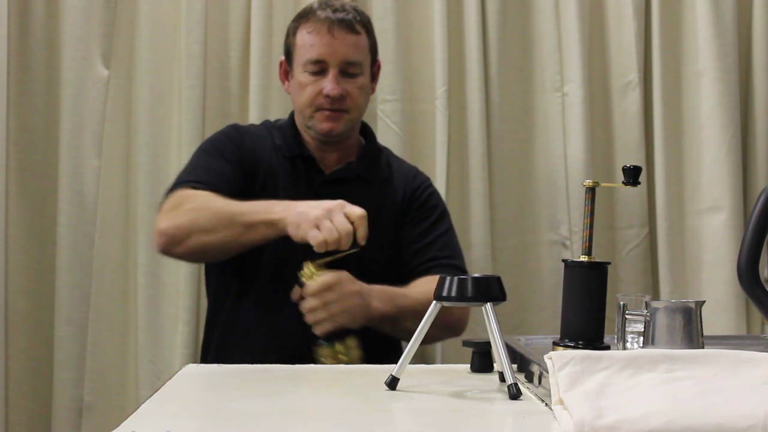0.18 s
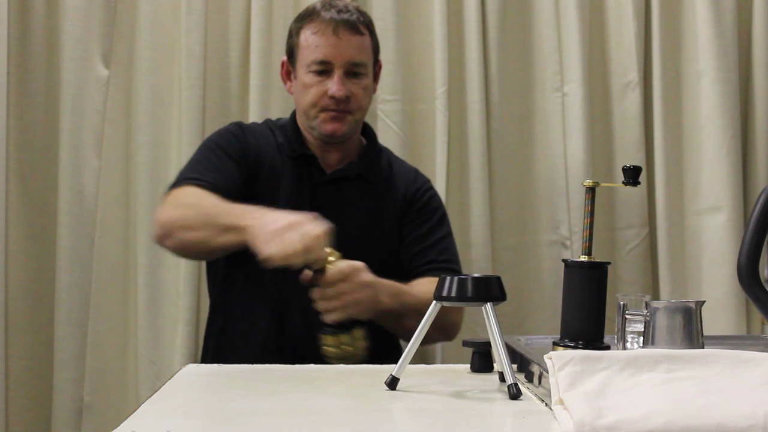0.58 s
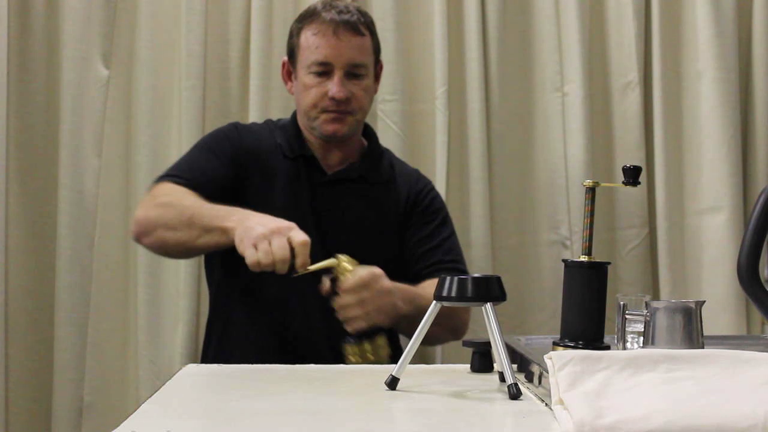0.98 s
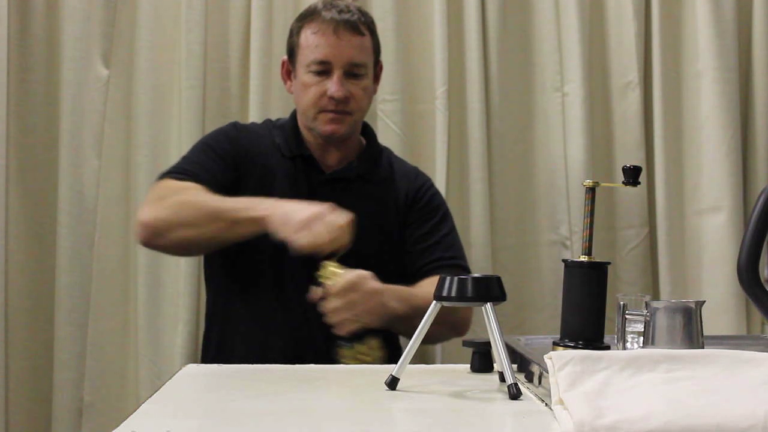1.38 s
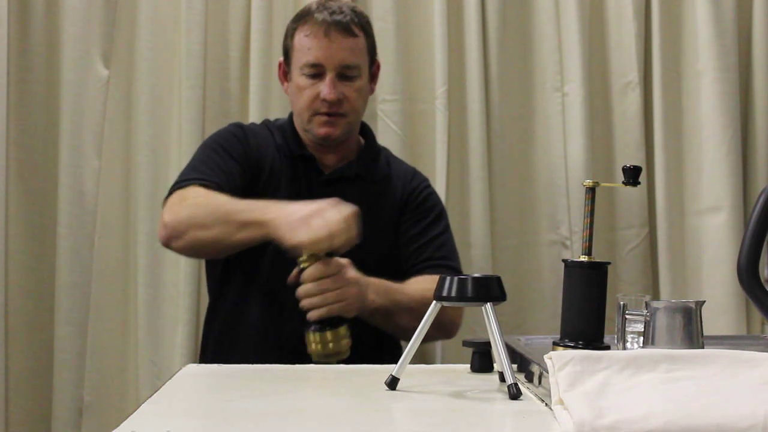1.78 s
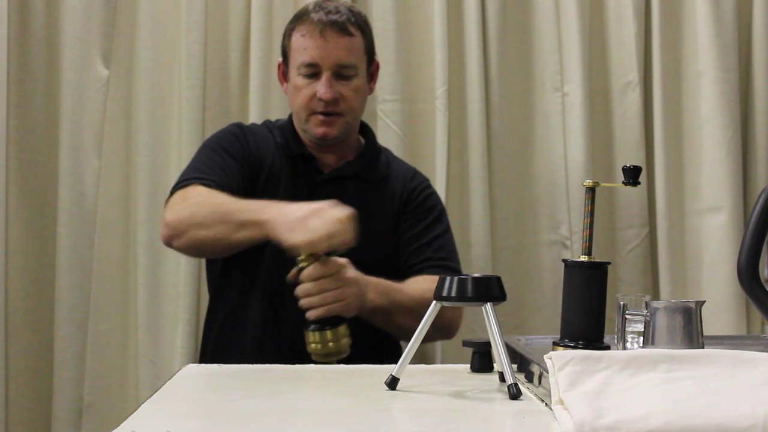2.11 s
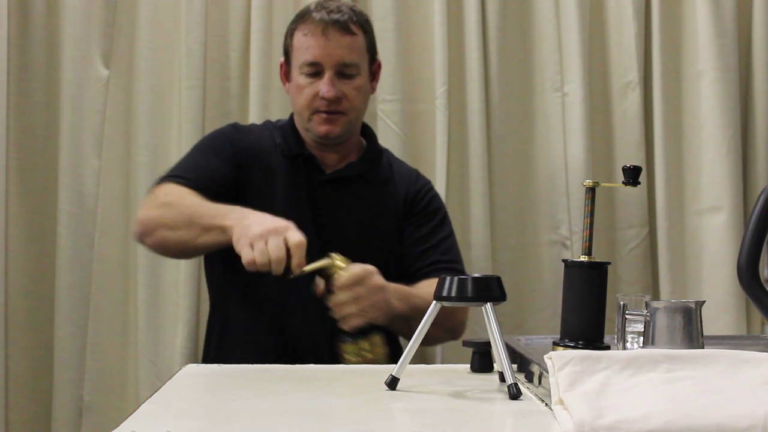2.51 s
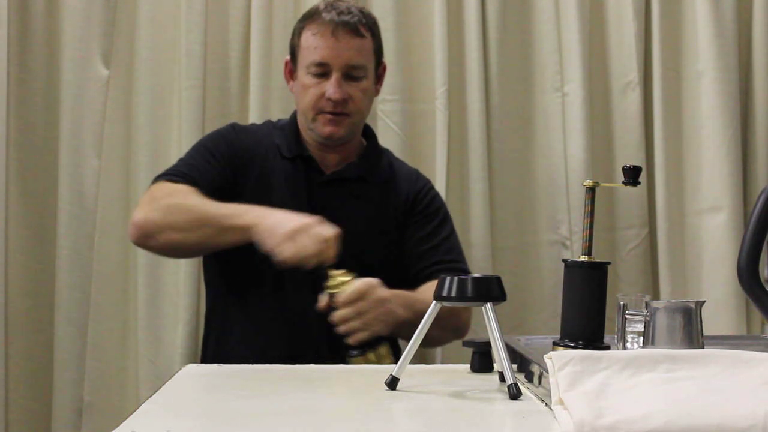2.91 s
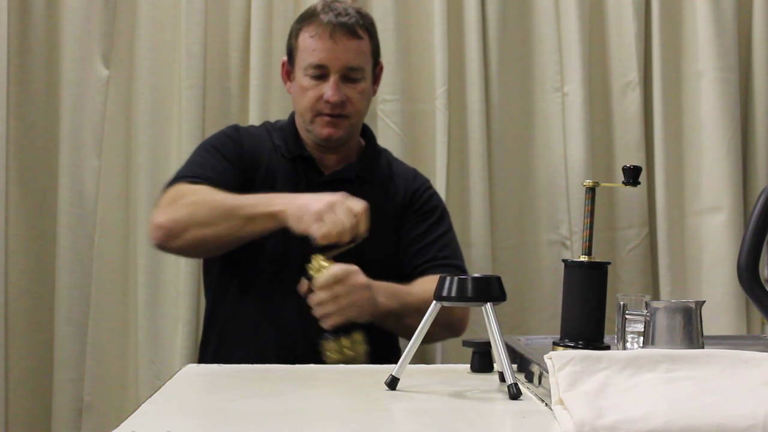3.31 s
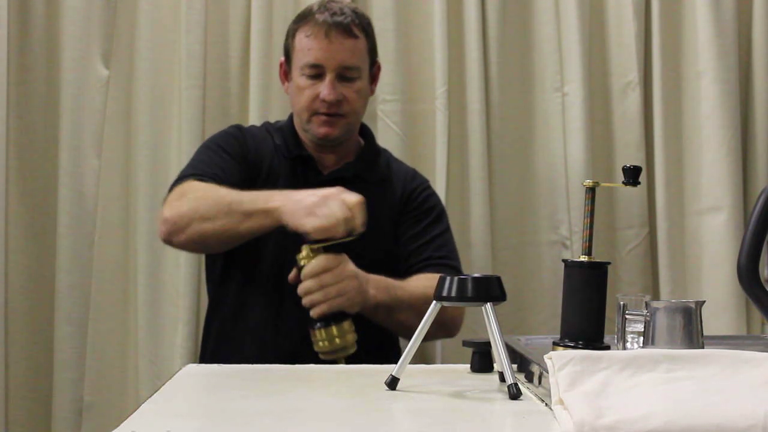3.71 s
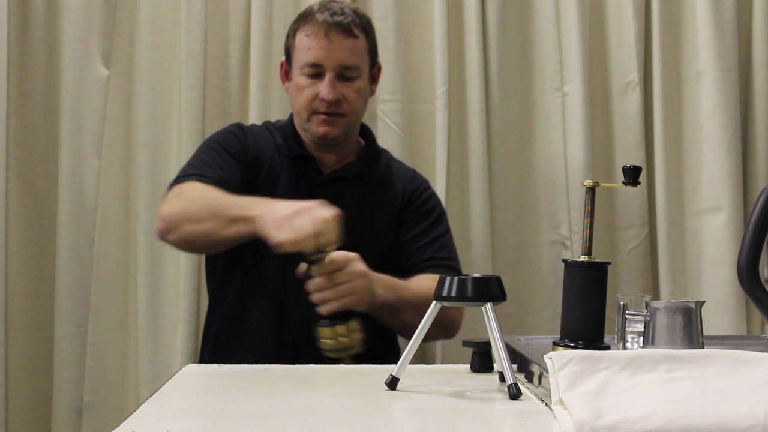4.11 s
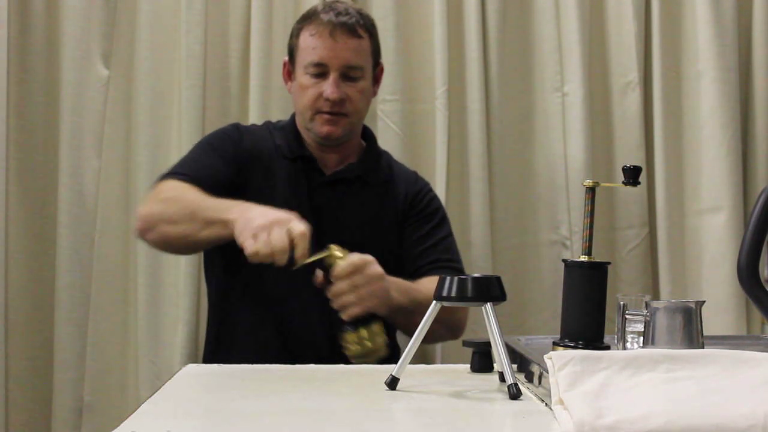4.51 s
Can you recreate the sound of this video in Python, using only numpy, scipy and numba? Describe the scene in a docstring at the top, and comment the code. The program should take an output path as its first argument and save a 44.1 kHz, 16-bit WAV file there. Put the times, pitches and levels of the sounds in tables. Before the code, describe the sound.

A hand coffee mill is cranked fast and steadily, beans crunching in a dense, bright, rattling crackle in a softly damped room.

```python
"""Hand coffee mill in a curtained room

A hand mill is cranked about three turns a second, two metres from the microphone.
Beans break between the burrs in a dense noise crackle that rings burr, shaft, tube and cup resonances;
single beans crack louder as short filtered bursts, and the crank squeaks now and then.
As the mill wobbles in the fist its resonances swell in turn; a faint wavering hum lies under it."""
import sys
import numpy as np
from scipy import signal
from scipy.fft import rfft, irfft, next_fast_len
from scipy.io import wavfile
from scipy.ndimage import uniform_filter1d
from numba import njit

SR = 44100
rng = np.random.default_rng(int(sys.argv[2]) if len(sys.argv) > 2 else 0)


def boost(x):
    """Linear amplitude factor 10**(x/20) for a level x in decibels (scalar or array-like)."""
    u = np.asarray(x, float) / 20
    return 10 ** u


def put_to_file(sound):
    """Save the sound as 16-bit audio at rate SR, in the file named by the first command-line argument."""
    columns = np.atleast_2d(sound).T  # one column per channel
    safe = np.clip(columns, -1, 1)
    whole_steps = np.round(safe * 32767)
    wavfile.write(sys.argv[1], SR, whole_steps.astype(np.int16))


N = 206737

# resonances of the burrs: centre_hz, width_hz, relative level_db
BURR_MODES = [(4170, 630, 0), (5000, 120, -16), (7600, 380, 13), (7900, 1400, -2)]


def level(x, db):
    """Scale to an rms level."""
    return x * boost(db) / np.sqrt(np.mean(x ** 2))


def curve(table):
    """Columns of a table, drawn as straight lines between its times, sample by sample."""
    s, *columns = np.transpose(table)
    return [np.interp(np.arange(N) / SR, s, c) for c in columns]


def walk(rate):
    """Random levels held 1 / rate s and slewed twice; spread near 1."""
    k = int(SR / rate)
    steps = np.repeat(rng.standard_normal(N // k + 1), k)
    return 1.39 * uniform_filter1d(uniform_filter1d(steps, k), k)[:N]


def swells(times, heights, dies_s, rise_s):
    """Sum of swells that rise straight to their height at each time and die away exponentially."""
    t = np.arange(N) / SR
    out = np.zeros(N)
    for s, height, die_s in zip(times, heights, dies_s):
        rise = np.clip(1 + (t - s) / rise_s, 0, 1)
        out += height * rise * np.exp(-np.maximum(t - s, 0) / die_s)
    return out


@njit
def band(x, hz, width):
    """State-variable resonance with a centre that may move, gain 1 at the centre."""
    y, b, l = np.empty(len(x)), 0., 0.
    for i in range(len(x)):
        g, k = np.tan(np.pi * hz[i] / SR), width / hz[i]
        v = (b + g * (x[i] - l)) / (1 + g * (g + k))
        b, l, y[i] = 2 * v - b, l + 2 * g * v, k * v
    return y


def ring(force, modes):
    """Every mode feels the same force envelope, filled with noise of its own."""
    out = np.zeros(N)
    for hz, width, db in modes:
        b, a = signal.iirpeak(hz, hz / width, fs=SR)
        out += boost(db) * signal.lfilter(b, a, force * rng.standard_normal(N))
    return out


def colour(x, points):
    """Impose a spectrum given on a log-frequency axis."""
    hz, db = np.transpose(points)
    size = next_fast_len(N)
    f = np.maximum(np.arange(size // 2 + 1) * SR / size, 1)
    gain = boost(np.interp(np.log(f), np.log(hz), db))
    return irfft(rfft(x, size) * gain, size)[:N]


def grinding():
    """One stream of fractures shakes every part; the body adds contacts of its own."""
    # how full the burrs run and how far the fist damps tube and cup: s, crushing_db, damp_db
    feed = [(0, -38, -0.5), (.35, -36.5, 4.5), (.68, -40, -1), (.9, -39.5, -0.5), (1.15, -40, -2.5),
            (1.45, -41, 0), (1.63, -42.5, -3), (1.85, -42.5, -3.5), (2.1, -39.5, 2.5), (2.45, -41, 1),
            (2.9, -42, -2.5), (3.05, -40.5, 2), (3.4, -40, -1), (3.7, -39, 3), (3.9, -40, 1),
            (4.22, -41.5, 4), (4.4, -38, 0.5), (4.55, -39, 4.5), (4.69, -37.5, 2)]
    # a fresh load of beans drops into the burrs: start_s, swell_db, dies_s, sideways_load_on_shaft_db
    bites = [(.15, 1, 0.12, 13), (.33, -1.5, .05, 7), (.6, 4.5, 0.024, -1), (.72, 3, 0.09, -9),
             (.83, 3, 0.13, 8), (1.2, 6.5, 0.059, -3), (1.37, 2.5, 0.13, 8), (1.49, 3, .05, 7),
             (1.67, 6, 0.2, 4), (1.89, 2, 0.021, 4), (1.96, 0, .04, -3), (2.18, 3, 0.024, 9),
             (2.4, 3.5, 0.084, 0), (2.52, 1.5, 0.019, 8), (2.62, 2.5, .05, 0), (2.7, 4.5, 0.13, -2),
             (3.08, 3.5, 0.23, 3), (3.43, 5.5, 0.024, 3), (3.6, 0.5, .05, -2), (3.79, 4, 0.031, 0),
             (3.95, 2.5, 0.21, 2), (4.12, 5.5, 0.023, -7), (4.31, -0.5, .05, 1), (4.41, 1.5, 0.087, 2)]
    # beans scrape along the tube wall: start_s, swell_db, dies_s, resonance_hz
    scrapes = [(.16, 7.5, 0.06, 1630), (.45, 3.5, 0.033, 1620), (.64, 2, 0.054, 1760), (1., 2, .05, 1770),
               (1.3, 7, 0.024, 1640), (1.39, 3, .04, 1520), (1.72, 3, .06, 1650), (1.9, 5, 0.033, 1620),
               (2.08, 6.5, .1, 1760), (2.31, 4, 0.036, 1740), (2.61, 8, 0.037, 1480),
               (2.69, 5.5, .05, 1760), (2.76, 3, .06, 1880), (2.96, 6.5, .04, 1500), (3.6, 5, 0.043, 1750),
               (3.93, 2, 0.045, 1780), (4.1, 5, 0.039, 1760), (4.54, 8.5, 0.086, 1680)]
    # the grounds jump in the cup: start_s, swell_db, dies_s
    jolts = [(.03, 5.5, 0.024), (.2, 6.5, 0.15), (.33, 3, 0.092), (.55, 2, 0.14), (.9, 3.5, 0.021),
             (1.23, 11, 0.05), (1.37, 7, 0.027), (1.5, 11, 0.034), (1.72, 11, 0.076), (1.9, 4.5, 0.033),
             (1.98, 5, 0.021), (2.28, 5.5, 0.11), (2.46, 7, 0.32), (2.98, 2.5, 0.031), (3.13, 6.5, 0.035),
             (3.81, 4.5, 0.11), (4.08, 7, 0.091), (4.25, 6, 0.097), (4.4, 2.5, 0.033), (4.62, -0.5, 0.034)]
    # resonances of air column, tube wall, cup and shaft: centre_hz, width_hz, relative level_db
    air_modes = [(1180, 100, -1), (1250, 150, -0.5), (1375, 160, 3)]
    wall_modes = [(1500, 74, 5), (1635, 91, -7), (1798, 74, -3.5), (2050, 240, -8), (2670, 570, -8)]
    cup_modes = [(381, 220, -7), (550, 90, 0), (721, 117, -1), (877, 130, 1.5), (1070, 74, 4)]
    shaft_modes = [(4750, 150, -5), (5030, 170, -14)]

    # wall and cup follow the feed, less the damping of the fist
    crush_db, damp_db = curve(feed)
    wall_db = crush_db + 0.2 - damp_db
    cup_db = crush_db - 8 - 0.32 * damp_db
    s, swell_db, dies_s, load_db = np.transpose(bites)
    crush_db = crush_db + swells(s, swell_db, dies_s, rise_s=.03)
    shaft_db = -4.5 + swells(s, load_db, dies_s, rise_s=.03)
    s, swell_db, dies_s, hz = np.transpose(scrapes)
    wall_db = wall_db + swells(s, swell_db, dies_s, rise_s=0.044)
    scrape_hz = curve(np.c_[s, hz])[0] + 60 * walk(15)
    cup_db = cup_db + swells(*np.transpose(jolts), rise_s=.06)
    air_db, air_hz = cranking()

    beans = crackle(per_s=500, spread_db=3., most_db=10, rub=1.8, bite_db=1.)
    body = crackle(per_s=300, spread_db=-0.5, most_db=8.5, rub=3.3, bite_db=-0.36)
    knocks = 0.41 * beans + body

    burr = level(ring(beans, BURR_MODES), -10.5) + level(crumbs(beans), 0.27)
    # the shaft follows its sideways load: its level swings more than the rest
    shaft = boost(shaft_db) * level(ring(beans, shaft_modes), -10.0)

    # the hand shifts on the tube and the beans tumble, so the strongest resonances slide
    sliding = band(knocks * rng.standard_normal(N), air_hz, 100.)
    air = band(level(ring(knocks, air_modes), -3) + level(sliding, -2), air_hz, 300.)
    scrape = band(knocks * rng.standard_normal(N), scrape_hz, 380.0)
    scrape = band(scrape, scrape_hz, 380.0)
    wall = band(ring(knocks, wall_modes), np.full(N, 1900.), 950.0)
    wall = level(wall, -6.5) + level(scrape, -5)
    cup = band(ring(knocks, cup_modes), np.full(N, 750.), 1130.0)

    tube = boost(air_db) * level(air, -0.34) + boost(wall_db) * wall
    return boost(crush_db) * (burr + shaft) + squeaks(knocks) + tube + boost(cup_db) * level(cup, -0.085)


def crackle(per_s, spread_db, most_db, rub, bite_db):
    """Force envelope: brief unequal fractures over a steady rub; the bite of the burrs comes and goes."""
    sizes_db = np.minimum(spread_db * rng.exponential(size=N), most_db)
    hits = (rng.random(N) < per_s / SR) * boost(sizes_db)
    breaks = signal.lfilter([1], [1, -np.exp(-1 / (0.00043 * SR))], hits)  # each dies over 0.43 ms
    return level((level(breaks, 0) + rub) * boost(bite_db * walk(50)), 0)


def crumbs(beans):
    """Coarse, middling and fine fragments break partly on their own, each size in its own register."""
    # registers of the three fragment sizes: low_hz, high_hz
    registers = [(1500, 3300), (3700, 6220), (6400, 16000)]
    # spectrum laid over the fragments: hz, gain_db
    crumb_spectrum = [(1180, -13), (2000, 0), (3010, -1), (3310, 1.5), (3960, -2.5), (4800, -2), (5830, -8),
                      (7020, -3), (7670, -3.5), (10100, -7), (10600, -12), (11800, -24), (15300, -58),
                      (22000, -120)]
    out = np.zeros(N)
    for lo_hz, hi_hz in registers:
        force = beans + crackle(per_s=900, spread_db=2., most_db=8, rub=1.4, bite_db=1.4)
        sos = signal.butter(2, (lo_hz, hi_hz), "band", fs=SR, output="sos")
        out += signal.sosfilt(sos, force * rng.standard_normal(N))
    return colour(out, crumb_spectrum)


def cracks():
    """Each bean: a noise burst of a few milliseconds around its own pitch that rings burr and tube."""
    # louder beans: start_s, relative snap_db, pitch_hz, relative thud_db into the tube
    loud_beans = [(0.0973, -25, 3210, -9), (0.1216, -21, 7490, -11), (0.146, -17, 3400, -10),
                  (0.2002, -26, 5190, -18), (0.3295, -20.5, 3920, -8.5), (0.7948, -18, 5280, -18),
                  (0.8274, -18.5, 4890, -17), (0.9965, -25, 2000, -8), (1.1925, -19, 3900, -27),
                  (1.2035, -20, 3500, -18), (1.3102, -20.5, 2690, -7), (1.3693, -15, 4900, -15),
                  (1.4905, -26, 4680, -14), (1.6701, -21, 3900, -13), (1.6876, -18, 4140, -16),
                  (1.7504, -22.5, 2050, -19), (1.8906, -20.5, 4800, -9), (1.9443, -25, 2330, -11),
                  (1.972, -22.5, 2540, -20), (2.0573, -22, 2200, -22), (2.177, -15, 4780, -14),
                  (2.215, -17.5, 2130, -7), (2.4023, -26, 3540, -11), (2.5152, -23.5, 7540, -12),
                  (2.6783, -21.5, 3540, -4), (2.7028, -23, 3320, -23), (2.7267, -19, 4160, -23),
                  (2.7852, -23, 4090, -10), (3.052, -20, 4480, -17), (3.1143, -19, 4470, -14),
                  (3.3636, -22, 3480, -10), (3.4034, -21, 3080, -11), (3.427, -20, 5050, -16),
                  (3.6322, -34, 2100, -13), (3.7359, -21, 2660, -15), (3.959, -19.5, 3460, -13),
                  (4.1248, -29, 3240, -5), (4.3011, -20, 2250, -8), (4.359, -20.5, 4830, -10),
                  (4.42, -19, 2920, -17), (4.4635, -17.5, 2010, -27), (4.5486, -20, 8000, -11),
                  (4.589, -19, 3290, -14), (4.613, -19, 2330, -5.5)]
    t = np.arange(int(.015 * SR)) / SR
    steady = np.ones(len(t))
    beans = np.r_[loud_beans, small_cracks(count=25)]
    noises = rng.standard_normal((len(beans), len(t)))
    out = np.zeros(N + len(t))
    for (s, db, hz, thud_db), noise in zip(beans, noises):
        burst = noise * t * np.exp(-t / .0005)
        bright = band(band(burst, 3600. * steady, 4000.), 3600. * steady, 4000.)
        snap = band(burst, hz * steady, .25 * hz) + .7 * bright
        for f, width, gain_db in BURR_MODES:
            snap = snap + 0.25 * boost(gain_db) * band(burst, f * steady, 1. * width)
        thud = band(band(burst, 1390.0 * steady, 650.0), 1480.0 * steady, 700.)
        # the thud is lifted 6 dB over its table entry
        bean = snap / np.abs(snap).max() + boost(thud_db + 6) * thud / np.abs(thud).max()
        i = int(s * SR)
        out[i:i + len(t)] += boost(db) * bean
    return signal.lfilter(*signal.butter(4, 10500, fs=SR), out[:N])


def small_cracks(count):
    """Mostly quieter beans at random moments and pitches, in the columns of the louder ones."""
    u = rng.random((count, 4))
    s = u[:, 0] * N / SR
    snap_db = -27.5 + 8 * (u[:, 1] - .5)
    pitch_hz = 2000 * 2.5 ** u[:, 2]
    thud_db = -10.5 + 12 * (u[:, 3] - .5)
    return np.c_[s, snap_db, pitch_hz, thud_db]


def cranking():
    """Level and pitch of the air column: a swell once a turn, as the mill's mouth faces the microphone."""
    # the open top swings towards the microphone: s, swell_db, air_column_hz
    turns = [(-.28, 8, 1250), (.04, 6.5, 1264), (.31, 9, 1204), (.62, 4, 1250), (.94, 5, 1235),
             (1.23, 7.5, 1240), (1.55, 2.5, 1235), (1.86, 4, 1250), (2.19, 8.5, 1254), (2.46, 5.5, 1194),
             (2.8, 5.5, 1240), (3.12, 4.5, 1260), (3.47, 8, 1265), (3.81, 8, 1240), (4.12, 7, 1194),
             (4.49, 6.5, 1270), (4.8, 9, 1250)]
    swell_db, hz = curve(turns)
    turn = np.interp(np.arange(N) / SR, np.transpose(turns)[0], np.arange(len(turns)))
    facing = (.5 + .5 * np.cos(2 * np.pi * turn)) ** 0.93
    air_db = -44 + swell_db * facing + 0.32 * walk(15)
    return air_db, hz + 24 * walk(12)


def squeaks(force):
    """The crank rubs on its shaft once in a while and sings a narrow, chattering note."""
    # squeaks: start_s, length_s, level_db (rms ahead of the fades), pitch_hz
    squeak_notes = [(.08, 0.088, -50, 3300), (0.709, 0.088, -41, 3430), (1.051, 0.14, -49, 3320),
                    (1.378, 0.084, -46, 3300), (2.283, 0.056, -42.5, 3290), (2.535, 0.084, -49, 3290),
                    (2.673, 0.08, -42, 3340), (3.949, 0.096, -50, 3380), (4.263, .07, -44, 3300),
                    (4.567, 0.14, -45, 3300)]
    out = np.zeros(N)
    t = np.arange(N) / SR
    for s, length, db, hz in squeak_notes:
        edge = np.clip(np.minimum(t - s, s + length - t) / 0.021, 0, 1)  # 21 ms fades
        on = edge > 0
        pitch = np.full(on.sum(), 1. * hz)
        note = band(force[on] * rng.standard_normal(on.sum()), pitch, 200.)
        note = band(note, pitch, 200.)
        out[on] = edge[on] * level(note, db)
    return out


def room(x, t60_s, wet_db, damp_hz, count=5):
    """Curtains leave a short, dull tail; the wobbling mill sounds the room from ever-changing spots."""
    t = np.arange(int(.3 * SR)) / SR
    decay = np.exp(-np.log(1000) * t / t60_s) * (t > .003)  # first reflections after 3 ms
    tails = rng.standard_normal((count, len(t))) * decay
    tails = signal.lfilter(*signal.butter(1, damp_hz, fs=SR), tails)
    spots = np.array([walk(18) for _ in tails])
    spots /= np.sqrt(np.sum(spots ** 2, axis=0))
    wet = np.zeros(N)
    for spot, tail in zip(spots, tails):
        wet += signal.fftconvolve(x * spot, tail / np.sqrt(np.sum(tail ** 2)))[:N]
    return x + boost(wet_db) * wet


def background():
    """Low room rumble of shaped noise, a sine hum that swells and wavers, and a thin mains tone."""
    # spectrum of the rumble: hz, relative level_db
    rumble_spectrum = [(12, -29), (20, -3.5), (48, -8.5), (92, -9), (141, -9.5), (263, -10.5), (543, -13.5),
                       (600, -19), (780, -56), (1320, -120)]
    # the hum throbs: middle_s, length_s, level_db (peak, before it wavers)
    throbs = [(.0, .25, -55), (.3, .2, -63), (.5, .2, -61), (0.684, .2, -56), (.93, .15, -57),
              (1.145, 0.14, -59.5), (1.37, 0.14, -57), (1.54, 0.14, -57), (1.73, 0.28, -57.5),
              (2.14, 0.27, -53.5), (2.38, 0.28, -54.5), (2.603, 0.19, -54), (2.878, .3, -54),
              (3.07, 0.12, -52), (3.2, .12, -55.5), (3.31, 0.11, -55.5), (3.45, 0.18, -52),
              (3.797, .3, -60), (4.06, .18, -56), (4.197, .2, -53), (4.4, 0.27, -56), (4.58, .25, -54)]
    t = np.arange(N) / SR
    rumble = level(colour(rng.standard_normal(N), rumble_spectrum), -55)
    throb = np.zeros(N)
    for s, length, db in throbs:
        throb += boost(db) * np.cos(np.pi * np.clip((t - s) / length, -.5, .5))
    hum_hz = 93 + 4.02 * walk(11)
    hum = boost(1.2 * walk(10)) * throb * np.sin(2 * np.pi * np.cumsum(hum_hz) / SR)
    mains = boost(-67) * np.sin(2 * np.pi * 200 * t)
    return rumble + hum + mains


def scene():
    """The mill in its room over the background."""
    mill = room(grinding() + cracks(), t60_s=0.22, wet_db=-12.0, damp_hz=9250)
    return (boost(0.4) * mill + background())[None]


def roll_off(x):
    """The treble ends steeply here."""
    return signal.sosfilt(signal.butter(12, 12200, fs=SR, output="sos"), x)


def record(dry):
    """The microphone chain rolls off both ends and sits slightly off zero."""
    cut = signal.sosfilt(signal.ellip(8, .3, 70, 11550, fs=SR, output="sos"), dry)
    cut = signal.lfilter(*signal.butter(2, 26, "high", fs=SR), cut)
    return roll_off(cut + .0015)


dry = scene()
out = record(dry)
put_to_file(out)
```